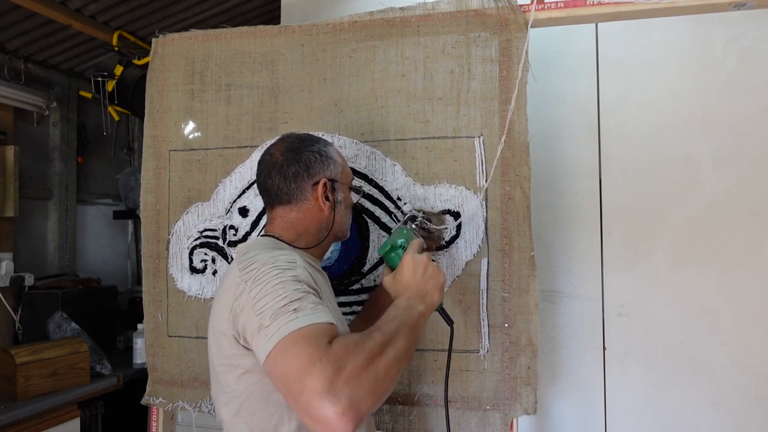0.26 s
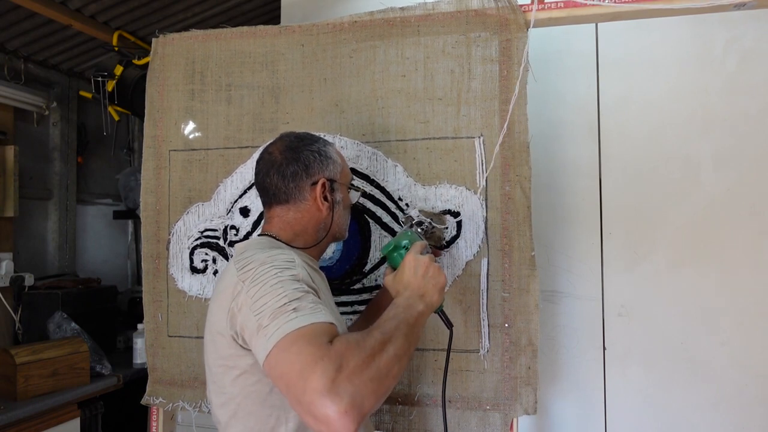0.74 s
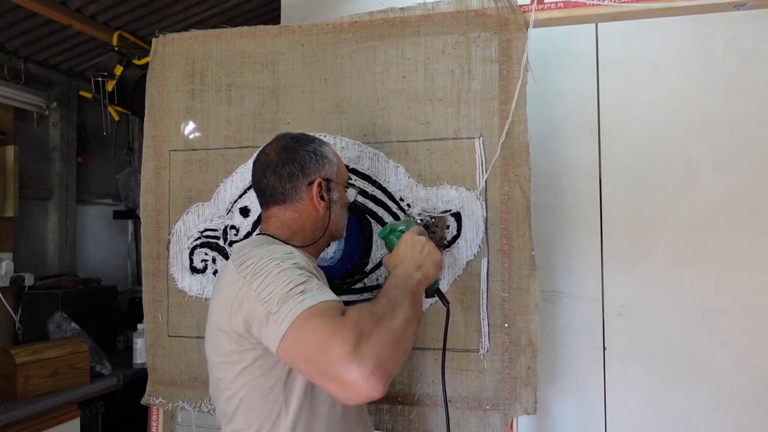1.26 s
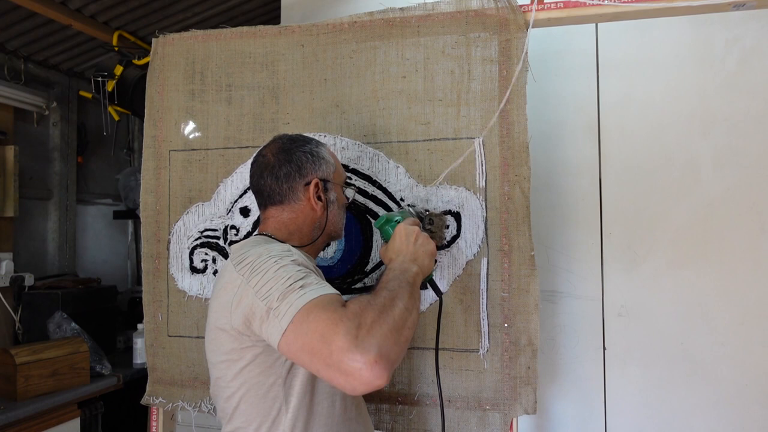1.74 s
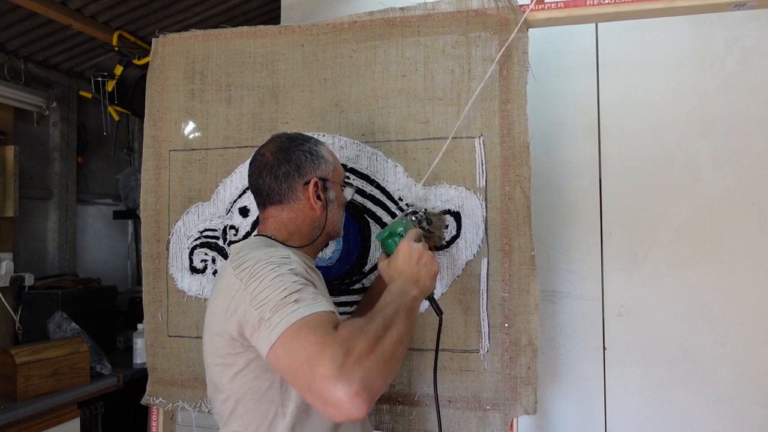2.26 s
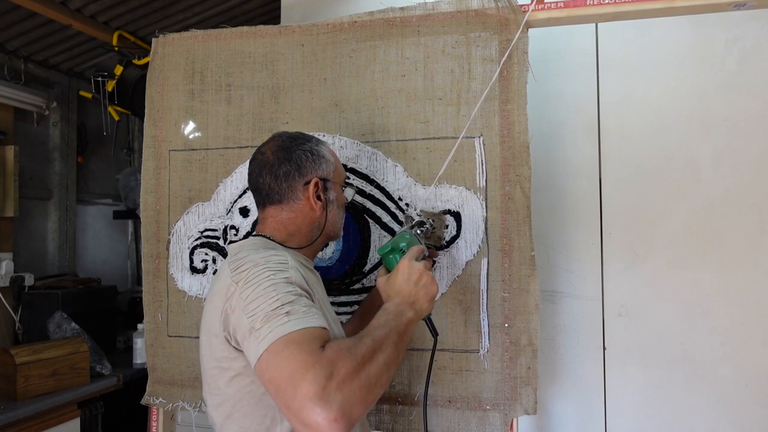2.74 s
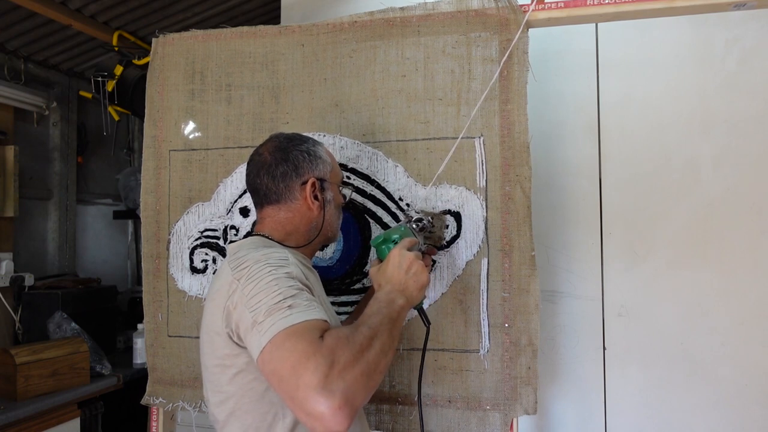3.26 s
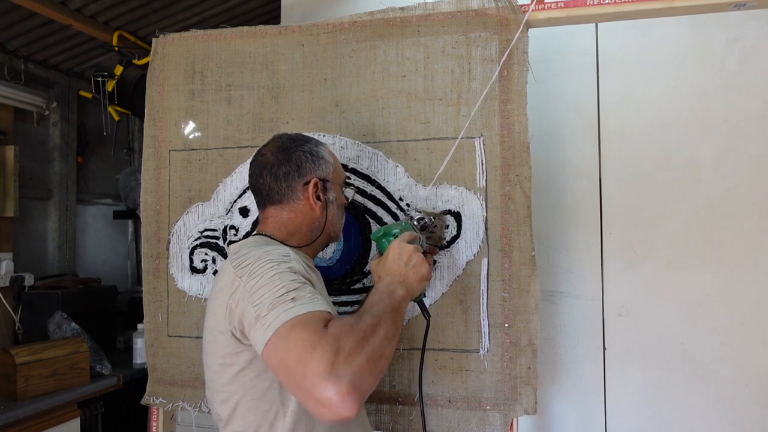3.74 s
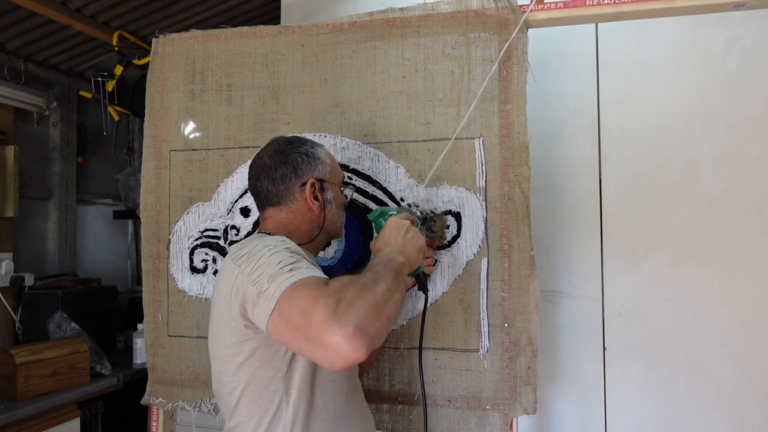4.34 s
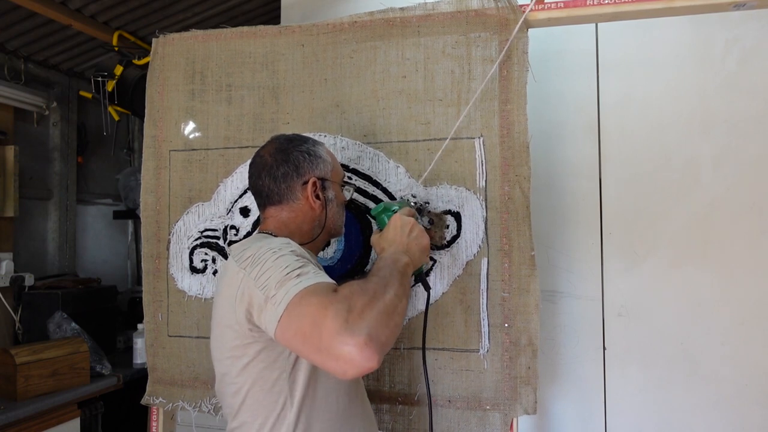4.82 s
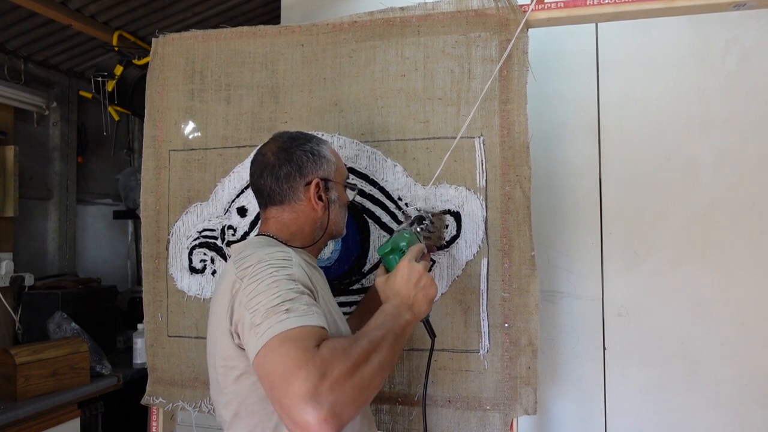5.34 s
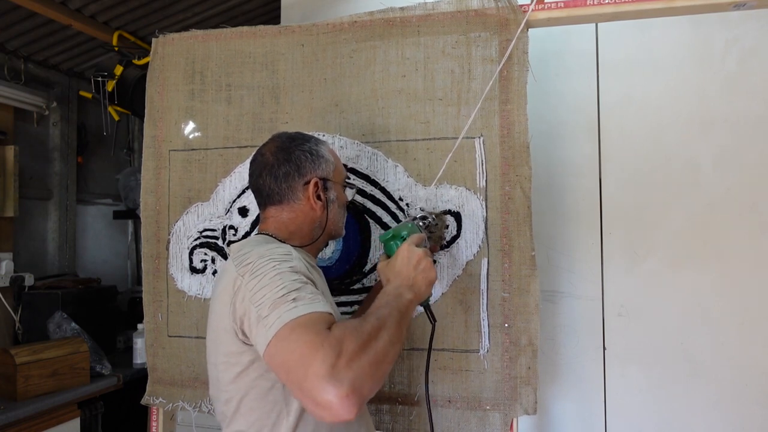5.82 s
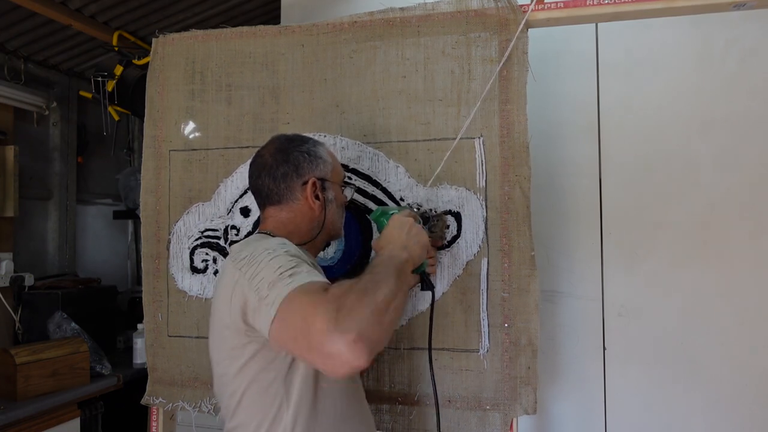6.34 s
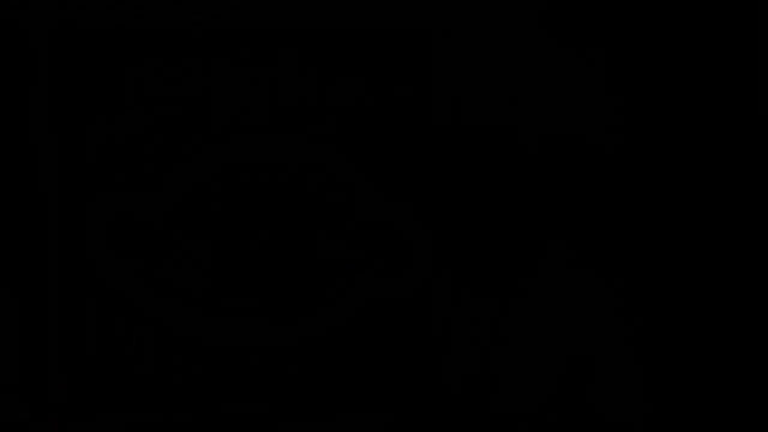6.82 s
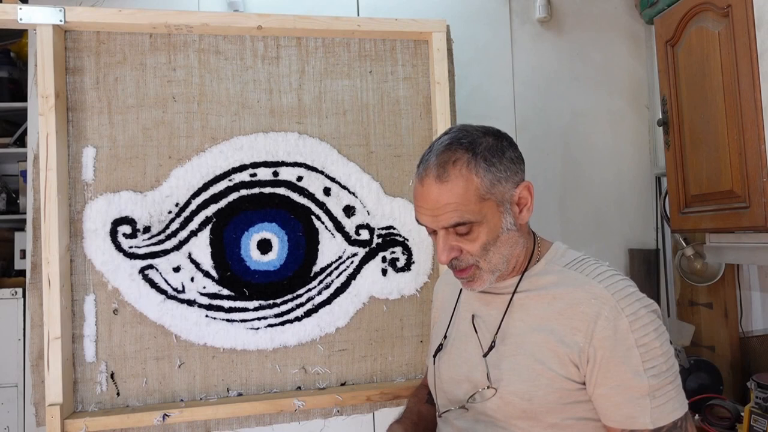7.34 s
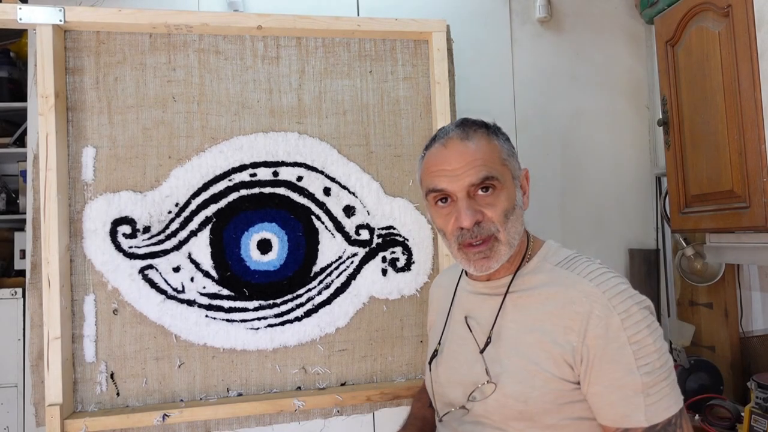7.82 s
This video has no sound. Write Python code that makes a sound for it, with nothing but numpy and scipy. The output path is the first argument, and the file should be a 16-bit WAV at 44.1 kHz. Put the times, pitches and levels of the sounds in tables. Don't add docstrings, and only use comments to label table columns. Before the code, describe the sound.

A handheld electric tufting gun has just been released at 0 seconds in a small, lightly reverberant workshop, heard fairly close in stereo. Its bright gear rattle, brush hiss and thin whine slide downward, becoming slow, grainy and almost silent by about 1.4. A click at 1.46 starts a second pull; the motor leaps to speed within a fraction of a second, with sharp needle and switch clacks to 2.06 and a low flutter of drumming cloth near the end. It then coasts down for nearly two seconds, fading out around 4, with a tiny tick at 4.13. A third pull runs from 4.27 to 4.83, knocking and drumming, then winds down again until about 6.4. The last pull starts at 6.49 with a crisp, sparking clack, revs hard, and is cut dead at 6.84. Only faint room air remains, with a small tick at 6.92, dropping quieter after 7.0 until the end near 8.

```python
import sys
import numpy as np
from scipy import signal
from scipy.fft import rfft, irfft, next_fast_len
from scipy.io import wavfile
from scipy.ndimage import uniform_filter1d, map_coordinates

SR = 44100
rng = np.random.default_rng(int(sys.argv[2]) if len(sys.argv) > 2 else 0)


def unload_audio(sound):
    columns = np.transpose(np.atleast_2d(sound))
    steps = np.round(np.clip(columns, -1, 1) * 32767)
    wavfile.write(sys.argv[1], SR, steps.astype(np.int16))


def convert_level_to_amplitude(level_db):
    exponent = np.asarray(level_db, float) / 20
    return 10 ** exponent


N = 356328

# pressed t/s, released t/s, top shaft speed f/Hz, drag/(1/s)
PULLS = [
    (-.7, -.091, 422, .605),
    (1.462, 2.055, 424, .586),
    (4.269, 4.825, 419, .58),
    (6.492, 7.1, 418, .58),
]
# driven level/dB, coasting level/dB, inrush spark level/dB, teeth stay pressed t/s
GRIP = [
    (2.5, 0, 0, .04),
    (0, -0.5, 2.5, .04),
    (-.5, 1, -3.5, .025),
    (1, 1, 4, .04),
]
# t/s, half length t/s, level/dB
SWITCH_BOUNCES = [
    (1.509, 0.0036, -7.5),
    (4.314, 0.003, -10),
    (6.504, 0.0024, -5.5),
]
# from t/s, to t/s, drum lift level/dB
HARD_STITCHING = [
    (1.96, 2.08, 14),
    (4.58, 4.85, 10),
    (6.66, 6.84, 10.5),
]
SPIN_UP_S, UNLOAD_S = .145, 0.046
DRY_FRICTION_HZ = 159
TURNS_PER_STITCH = 17

# shaft f/Hz, gear level/dB, then brush, growl and cloth level/dB re gear
DRIVEN_LEVELS = [(5.025, -33.5, 2, -21, -56), (120, -28, 1.5, -21, -53.5), (205, -25.5, 2, -21, -51),
                 (268, -20, -5, -16.5, -43.5), (340, -21.5, -2.5, -14, -33), (420, -20.5, -0.5, -14, -33.5)]
# shaft f/Hz, gear level/dB, then brush, growl and cloth level/dB re gear
FREE_LEVELS = [(3, -87, -7, -5.5, -5), (12, -69, -3, -13, -25), (24, -49.5, -12.5, -14, -35),
               (42, -39.5, -5, -25.5, -50), (70, -37, 0, -20.5, -57), (115, -33, 1.5, -21.5, -54),
               (200, -32, 3.5, -18.5, -50), (290, -29, 1, -12.5, -42), (400, -25, -1, -12.5, -40)]

# f/Hz, width f/Hz, level/dB
CASE_MODES = [(764, 45, -12), (1073, 57, -5), (1400, 51, -12.5), (2554, 87, 1), (3270, 150, 12),
              (3695, 45, 21.5), (5730, 140, -11.5)]
# f/Hz, level/(dB per Hz)
GEARS_LOADED = [(530, -38), (900, -20), (1600, -3), (1880, -6.5), (2480, -1.5), (2700, -2), (3610, -1.5),
                (4180, -3.5), (5270, -4.5), (7000, -11), (9100, -28.5), (15400, -120)]
# f/Hz, level/(dB per Hz)
GEARS_FREE = [(530, -42), (900, -15), (1200, -6.5), (1530, -3), (1770, -5), (2350, 0.5), (2630, -1.5),
              (3680, -1), (4720, -0.5), (7000, -12), (9100, -16), (15400, -120)]
# f/Hz, level/(dB per Hz)
GEARS_SLOW = [(530, -54), (900, -32), (1050, -4.5), (1200, -25), (1310, -5.5), (1770, -7), (2350, 1.5),
              (2630, -3.5), (3370, -1.5), (4760, -5.5), (7000, -7.5), (9100, -33), (15400, -120)]
# f/Hz, level/(dB per Hz)
CAVITY = [(950, -40), (1060, -13), (1170, -40), (1850, -40), (2050, -3), (2300, 0), (2480, -3), (2650, -40)]
# f/Hz, level/(dB per Hz)
NEEDLE_GUIDE = [(3640, -40), (3720, 0), (3800, -2), (3880, -40)]
# f/Hz, level/(dB per Hz)
BRUSH_FAST = [(3240, -39.5), (5500, 2), (6350, -1.5), (9830, 1), (12300, -3.5), (15100, -2), (16000, -31.5)]
# f/Hz, level/(dB per Hz)
BRUSH_SLOW = [(3240, -43.5), (5500, -1), (8410, 1.5), (10300, -3), (12200, -8), (15200, -9.5), (16000, -14)]
# f/Hz, level/(dB per Hz)
SPARKS = [(7000, -47.5), (8800, -2.5), (10000, 3), (12000, -2), (14000, -17.5)]
# f/Hz, level/(dB per Hz)
GROWL_FAST = [(150, -51), (260, -17.5), (378, -10.5), (502, -7), (587, -3.5), (1060, 1.5), (1250, 0),
              (1620, -25), (2750, -120)]
# f/Hz, level/(dB per Hz)
GROWL_SLOW = [(150, -69.5), (260, -39.5), (415, -28), (489, -35), (631, -6.5), (848, -11), (1050, -4),
              (1250, -9.5), (1620, -36), (2750, -120)]
# f/Hz, level/(dB per Hz)
CLOTH_DRUM = [(15, -53.5), (25, -32), (92, -16), (134, -4), (208, -3.5), (242, -2.5), (285, -3),
              (340, -13.5), (440, -31.5), (750, -120)]

# multiple, level/dB at full speed
SHAFT_ORDERS = [(1, -33), (2, -43), (3, -41.5), (4, -52), (5, -46), (6, -51), (8, -47), (10, -49),
                (11, -45), (12, -43)]
# f/Hz, level/dB
SHAFT_RADIATION = [(120, -70), (180, -38), (220, -25), (265, -20), (370, -16), (430, -14), (540, -11),
                   (800, -6), (1100, 0)]
# shaft f/Hz, level/dB
HUM_BY_SPEED = [(60, -45), (120, -26), (150, -15), (200, -10), (400, 0)]
# multiple, level/dB
BEARING_ORDERS = [(2.64, -38), (5.28, -46), (7.92, -43)]
# f/Hz, level/dB
BEARING_RADIATION = [(250, -40), (330, -24), (390, -11), (470, -16), (580, -8), (750, 0), (950, -9),
                     (1100, -8), (1400, -3), (3000, -5)]
# multiple, level/dB
COMMUTATOR_ORDERS = [(22, -41), (23, -38.5), (24, -34.5), (25, -43), (46, -43), (47, -41), (48, -37.5),
                     (49, -44), (71, -42), (72, -36.5), (96, -43)]
# f/Hz, level/dB
COMMUTATOR_RADIATION = [(1500, -24), (2500, -12), (3300, -5), (4000, 1), (4800, -2), (5750, 1), (7200, -2),
                        (8600, 0), (10500, 0), (13000, -7), (15000, -16)]
# shaft f/Hz, level/dB
WHINE_BY_SPEED = [(4, -50), (50, -14), (110, -5), (180, -2), (240, -1), (315, -3), (400, -10)]
TOP_HZ = 15850

# t/s, peak level/dB
KNOCKS = [(1.4641, -12), (1.5134, -9.5), (1.643, -0.5), (1.6944, -4), (1.848, -13.5), (1.8974, -6),
          (1.9504, -2.5), (2.063, -8), (4.2712, -21), (4.5095, -8.5), (4.6248, -6), (4.6924, -9),
          (6.4932, -10.5), (6.506, -8.5)]
# t/s, peak level/dB, f/Hz, room level/dB, ring level/dB
HARD_CONTACTS = [
    (4.135, -33, 3480, 4, -15),
    (6.9174, -28.5, 4390, -4, -5),
]
# f/Hz, t60/s
WORKSHOP_T60 = [(200, 0.24), (2000, 0.66), (6000, 0.18), (14000, 0.12)]
# f/Hz, side level/dB re mid
TOOL_WIDTH = [(60, -15), (200, -22), (400, -19), (800, -15), (1500, -14), (2500, -10.5), (5000, -10),
              (9000, -10.5), (15000, -16)]
# f/Hz, level/(dB per Hz)
AIR_COLOUR = [(15, -80), (25, -34.5), (92, -15.5), (285, -9), (451, -7.5), (503, -9.5), (545, -12.5),
              (641, -2), (796, -10), (1790, -11), (2350, -16.5), (12500, -31.5), (16000, -41)]
# f/Hz, side level/dB re mid
AIR_WIDTH = [(60, -3.5), (110, -0.5), (200, 0.5), (380, 0.5), (700, 2), (1290, 1), (2380, 1.5), (4400, 0),
             (8120, 0), (15000, -2.5)]

SCENE_CHANGES_S, AIR_DROPS_S = 6.839, 7.005
FLICKER_DELAY_S, FLICKER_DB = .011, -38.5
AIR_UNDER_GUN_DB, AIR_AFTER_GUN_DB, AIR_LAST_DB = -72.5, -58, -67.8


def gun():
    t = np.arange(N) / SR
    shaft_hz, drive = motor()
    turn = 2 * np.pi * np.cumsum(shaft_hz) / SR

    gear_db, brush_db, growl_db, cloth_db = levels(shaft_hz, drive)
    for start, end, lift_db in HARD_STITCHING:
        cloth_db = cloth_db + lift_db * np.clip(np.minimum(t - start, end - t) / .03 + 1, 0, 1)
    pull = np.searchsorted([row[0] for row in PULLS], t, side="right") - 1
    driven_db, free_db, spark_db, _ = np.transpose(GRIP)[:, pull]
    grip_db = drive * driven_db + (1 - drive) * free_db
    gear_db = gear_db + grip_db
    for s, half_s, db in SWITCH_BOUNCES:
        gear_db = gear_db + db * np.clip(2 - 2 * abs(t - s) / half_s, 0, 1)

    load = np.clip(uniform_filter1d(drive, size=500), 0, 1)
    slow = np.clip((230 - shaft_hz) / 150, 0, 1) * (1 - load)
    fast = 1 - slow
    free = abs(1 - load - slow)
    inrush = sum((t > on) * convert_level_to_amplitude(-60 * abs(t - on) / 1.1) for on, *_ in PULLS)
    bent = 1 + 0.049 * np.cos(turn + .6 * wobble(30))
    stitch = 1 + load * 0.058 * np.cos(turn / TURNS_PER_STITCH)

    gears = np.sqrt(load) * rattle(GEARS_LOADED, bent * stitch, grit_db=0, lift_db=3)
    gears += np.sqrt(free) * rattle(GEARS_FREE, bent, grit_db=0, lift_db=7.5)
    gears += np.sqrt(slow) * rattle(GEARS_SLOW, bent * convert_level_to_amplitude(1.2 * wobble(35)), grit_db=-0.5, lift_db=1)
    gears += convert_level_to_amplitude(-11) * slow * convert_level_to_amplitude(3 * wobble(30)) * rattle(CAVITY, bent, grit_db=1, lift_db=-20)
    gears += convert_level_to_amplitude(-15) * fast * rattle(NEEDLE_GUIDE, bent, grit_db=1, lift_db=-20)

    brush = np.sqrt(fast) * rattle(BRUSH_FAST, bent * stitch, grit_db=1, lift_db=-16)
    brush += np.sqrt(slow) * rattle(BRUSH_SLOW, bent, grit_db=-0.5, lift_db=-20.5)
    brush += convert_level_to_amplitude(-4 + spark_db) * inrush * rattle(SPARKS, 1, grit_db=4, lift_db=-20)

    growl = np.sqrt(fast) * rattle(GROWL_FAST, bent, grit_db=1.5, lift_db=-1.5)
    growl += np.sqrt(slow) * rattle(GROWL_SLOW, bent, grit_db=-0.5, lift_db=-8.5)

    drumming = convert_level_to_amplitude(3.1 * np.cos(turn / TURNS_PER_STITCH) + 2.5 * wobble(20))
    cloth = rattle(CLOTH_DRUM, drumming, grit_db=3, lift_db=-18.5)
    cloth *= convert_level_to_amplitude(cloth_db - 11 * (1.5 - load))
    cloth *= convert_level_to_amplitude(along([(200, -22), (330, 0)], shaft_hz))

    hum = tones(SHAFT_ORDERS, SHAFT_RADIATION, HUM_BY_SPEED, shaft_hz, smear=.05)
    hum *= convert_level_to_amplitude(-14 * inrush - 2 * load)
    bearing = convert_level_to_amplitude(-14 * load) * tones(BEARING_ORDERS, BEARING_RADIATION, HUM_BY_SPEED, shaft_hz, smear=.06)
    whine = tones(COMMUTATOR_ORDERS, COMMUTATOR_RADIATION, WHINE_BY_SPEED, shaft_hz, smear=.036)
    whine *= convert_level_to_amplitude(grip_db - 3 * load)

    noise = gears + convert_level_to_amplitude(brush_db) * brush + convert_level_to_amplitude(growl_db - 2) * growl + cloth
    return convert_level_to_amplitude(gear_db + 0.54 * wobble(12)) * noise + hum + bearing + whine


def motor():
    t = np.arange(N) / SR
    shaft_hz, drive, start_hz = np.zeros(N), np.zeros(N), 0
    next_pulls = [row[0] for row in PULLS[1:]] + [np.inf]
    for (on, off, top_hz, drag), (*_, held_s), then in zip(PULLS, GRIP, next_pulls):

        def speed(s):
            run_up = np.exp(-(np.minimum(s, off) - on) / SPIN_UP_S)
            reached_hz = top_hz - (top_hz - start_hz) * run_up
            braking = np.exp(-drag * np.maximum(s - off, 0))
            return np.maximum((reached_hz + DRY_FRICTION_HZ) * braking - DRY_FRICTION_HZ, 0)

        now = (t >= on) & (t < then)
        shaft_hz[now] = speed(t[now])
        drive[now] = np.exp(-np.maximum(t[now] - off - held_s, 0) / UNLOAD_S)
        start_hz = speed(then)
    return shaft_hz, drive


def levels(shaft_hz, drive):
    def law(rows):
        speed, *columns = np.transpose(rows)
        return np.array([np.interp(shaft_hz, speed, column) for column in columns])

    return drive * law(DRIVEN_LEVELS) + (1 - drive) * law(FREE_LEVELS)


def rattle(spectrum, beat, grit_db, lift_db):
    shaken = rng.standard_normal(N) * convert_level_to_amplitude(grit_db * wobble(900)) * beat
    return unit(filtered(shaken, lambda hz: convert_level_to_amplitude(along(spectrum, hz)) * case(hz, lift_db)))


def case(hz, lift_db):
    top = max(db for _, _, db in CASE_MODES)
    power = 1
    for centre, width, db in CASE_MODES:
        mode = convert_level_to_amplitude(2 * (lift_db + 0.52 * (db - top)))
        power = power + mode / (1 + (2 * (hz - centre) / width) ** 2)
    return np.sqrt(power)


def tones(orders, radiate, speed_law, shaft_hz, smear):
    turn = 2 * np.pi * np.cumsum(shaft_hz) / SR
    total = np.zeros(N)
    for k, db in orders:
        level = convert_level_to_amplitude(db + along(radiate, k * shaft_hz) + 3 * wobble(40))
        sine = np.sin(k * (turn + smear * wobble(150)))
        total += level * sine * (k * shaft_hz < TOP_HZ)
    return np.sqrt(2) * convert_level_to_amplitude(along(speed_law, shaft_hz)) * total


def clacks():
    x, t = np.zeros(N + SR), np.arange(600) / SR
    for s, db in KNOCKS:
        x[round(s * SR):][:len(t)] += convert_level_to_amplitude(db - 3.5 - 60 * t / .008) * rng.standard_normal(len(t))
    return filtered(x[:N], lambda hz: hz ** 4 / (hz ** 4 + 1300 ** 4) / (1 + (hz / 7000) ** 2))


def ticks():
    mid, side, t = np.zeros(N + SR), np.zeros(N + SR), np.arange(900) / SR
    band = signal.butter(2, [2800 / SR * 2, 8500 / SR * 2], "band")
    for s, db, hz, room_db, ring_db in HARD_CONTACTS:
        ring = convert_level_to_amplitude(db + ring_db - 60 * t / 0.0047) * np.sin(2 * np.pi * hz * t)
        crack = signal.lfilter(*band, rng.standard_normal(len(t)))
        hit = ring + convert_level_to_amplitude(db - 2 - 60 * t / 0.0031) * crack
        wet = convert_level_to_amplitude(room_db) * signal.fftconvolve(hit, tail())
        start = round(s * SR)
        mid[start:][:len(hit)] += hit
        mid[start:][:len(wet)] += wet
        side[start:][:len(wet)] += convert_level_to_amplitude(room_db - 6.5) * signal.fftconvolve(hit, tail())
    return stereo(mid[:N], side[:N])


def tail():
    hz, t, z = signal.stft(rng.standard_normal(SR // 2), SR, nperseg=256)
    t60 = along(WORKSHOP_T60, hz)[:, None]
    answer = signal.istft(z * convert_level_to_amplitude(-60 * t / t60) / np.sqrt(t60), SR, nperseg=256)[1]
    return np.pad(answer, (130, 0)) / np.linalg.norm(answer)


def treble_dropouts(x, from_hz, share):
    hz, _, z = signal.stft(x, SR, nperseg=1024)
    field = rng.standard_normal(z.shape[1:])
    field = uniform_filter1d(field, size=4, axis=0)
    field = unit(uniform_filter1d(field, size=5, axis=1))
    reach = share * np.clip((hz[:, None] - from_hz) / 2500, 0, 1) ** .5
    loss_db = -30 * np.clip(6 * (field - 3 + reach), 0, 1)
    return signal.istft(z * convert_level_to_amplitude(loss_db), SR, nperseg=1024)[1][:, :N]


def air():
    t = np.arange(N) / SR
    steps = [AIR_UNDER_GUN_DB, AIR_AFTER_GUN_DB]
    air_db = np.select([t < SCENE_CHANGES_S, t < AIR_DROPS_S], steps, AIR_LAST_DB)
    level = convert_level_to_amplitude(air_db + 0.8 * wobble(2.9))
    mid, side = filtered(rng.standard_normal((2, N)), lambda hz: convert_level_to_amplitude(along(AIR_COLOUR, hz)))
    side = filtered(side, lambda hz: convert_level_to_amplitude(along(AIR_WIDTH, hz)))
    return level * stereo(mid, side) / np.std(mid)


def unit(x):
    return x / np.sqrt(np.mean(x ** 2) + 1e-20)


def along(points, hz):
    f, v = np.transpose(points)
    return np.interp(np.log(hz + 1), np.log(f + 1), v)


def wobble(rate):
    return map_coordinates(rng.standard_normal(int(N * rate / SR) + 4), [np.arange(N) * rate / SR])


def filtered(x, gain):
    m = next_fast_len(N + SR // 2)
    return irfft(rfft(x, m) * gain(np.fft.rfftfreq(m, 1 / SR)), m)[..., :N]


def stereo(mid, side):
    return np.array([mid + side, mid - side]) * convert_level_to_amplitude([[-.2], [.2]])


def scene():
    t = np.arange(N) / SR
    tool = gun() + clacks()
    mid = convert_level_to_amplitude(-0.22) * (tool + convert_level_to_amplitude(-8) * signal.fftconvolve(tool, tail())[:N])
    side = filtered(signal.fftconvolve(tool, tail())[:N], lambda hz: convert_level_to_amplitude(along(TOOL_WIDTH, hz)))
    workshop = treble_dropouts(stereo(mid, side), from_hz=9500, share=2.2)
    heard = np.clip((SCENE_CHANGES_S - t) / .002, 0, 1) + convert_level_to_amplitude(-72)
    heard += convert_level_to_amplitude(FLICKER_DB) * np.exp(-((t - SCENE_CHANGES_S - FLICKER_DELAY_S) / 0.0007) ** 2)
    return heard * workshop + ticks() * (t < AIR_DROPS_S) + air()


def top_cut(x):
    return signal.sosfilt(signal.butter(12, 16750, fs=SR, output="sos"), x)


def record(dry):
    def response(hz):
        top = np.clip((TOP_HZ + 100 - hz) / 200, 0, 1) ** 2 + convert_level_to_amplitude(-45.5)
        return top * hz ** 2 / (hz ** 2 + 45 ** 2)

    return top_cut(filtered(dry, response))


dry = scene()
out = record(dry)
unload_audio(out)
```